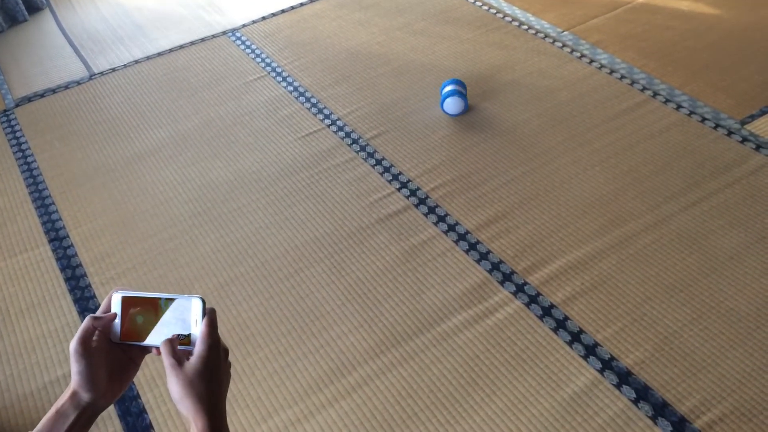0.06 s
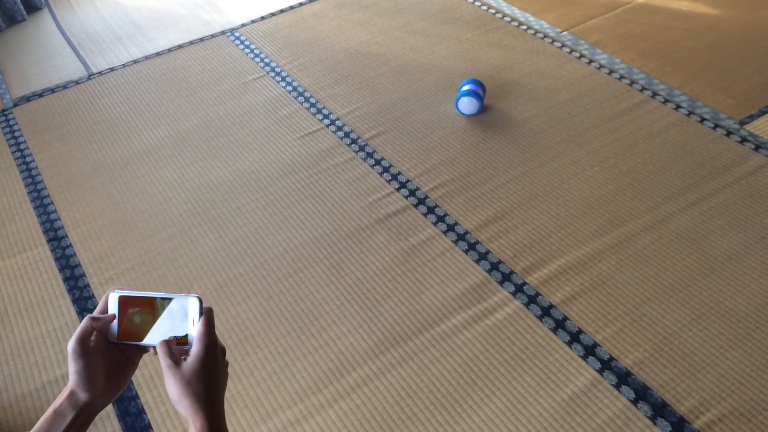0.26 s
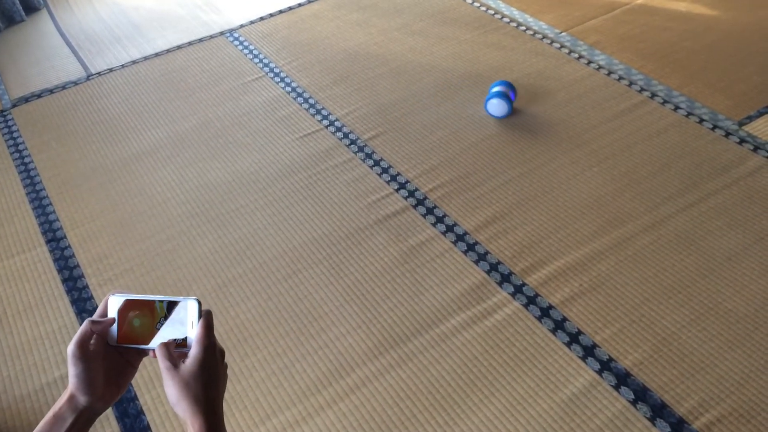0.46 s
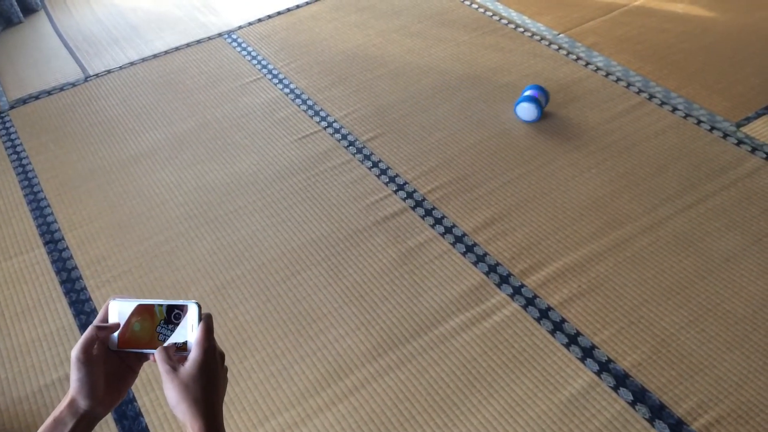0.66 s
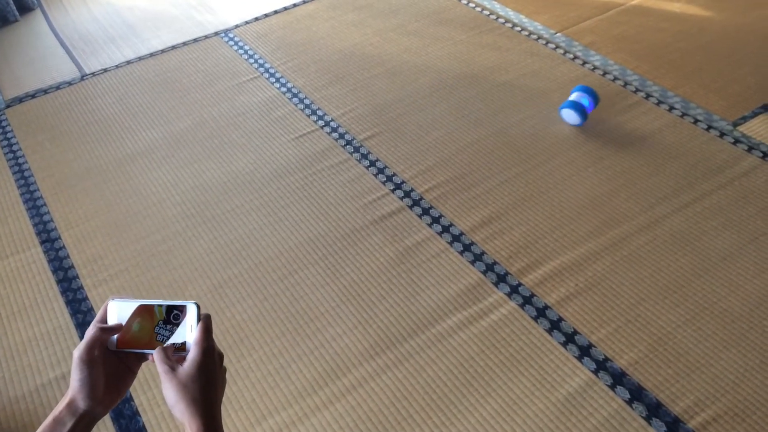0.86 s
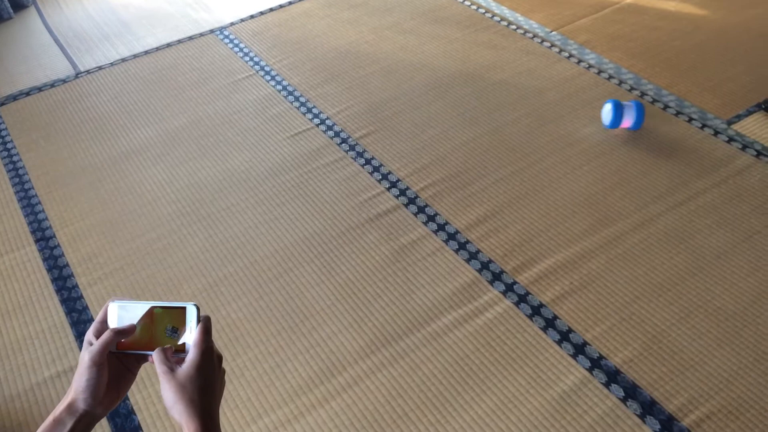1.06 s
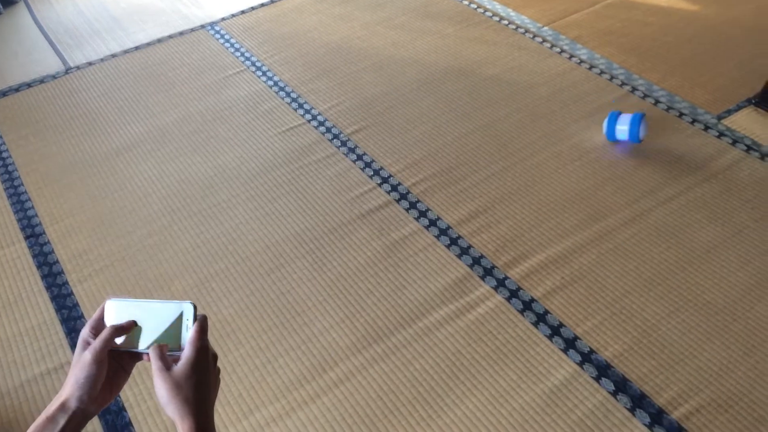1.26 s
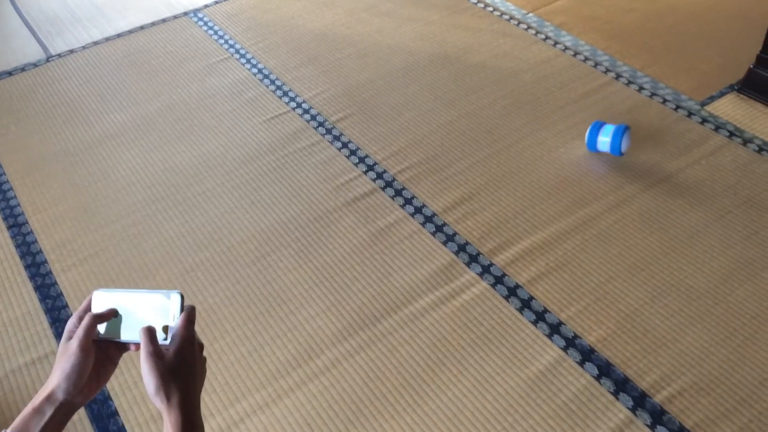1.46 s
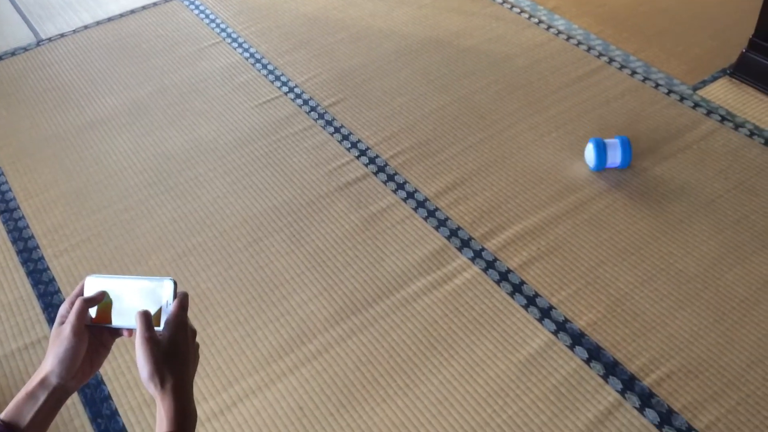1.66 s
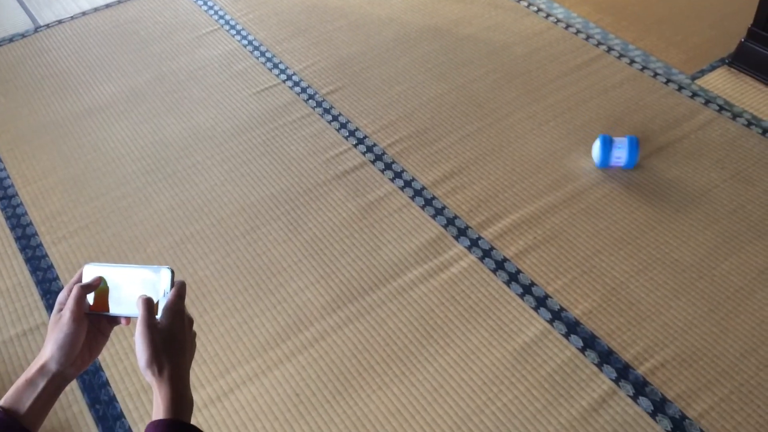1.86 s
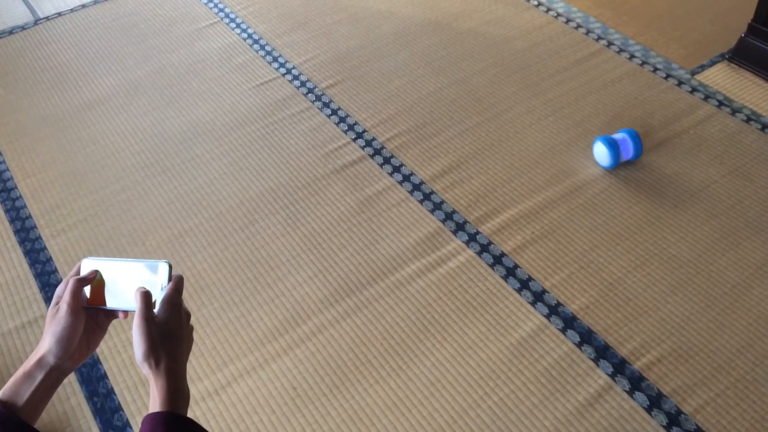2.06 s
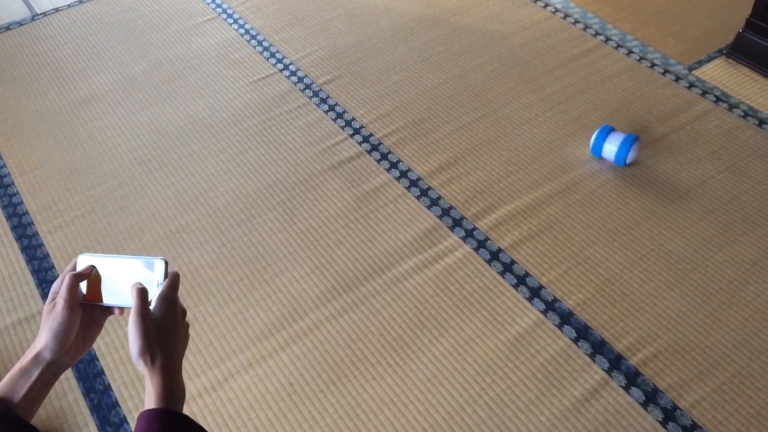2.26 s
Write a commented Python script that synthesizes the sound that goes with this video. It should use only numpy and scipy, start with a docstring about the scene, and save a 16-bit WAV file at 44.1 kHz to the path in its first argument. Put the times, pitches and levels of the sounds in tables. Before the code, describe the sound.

A small toy robot's gears whir and chatter, rising in pitch as it speeds across a straw mat with soft bumps and low rumble. It brakes, then creeps on with light plastic clicks, about two metres away in a quiet room.

```python
"""A quiet room, a woven straw mat two metres away: a small barrel-shaped toy robot speeds up across it,
turns, brakes and creeps on. Up front, its gear teeth whine and chatter in the ringing plastic shell
and loose parts click. Underneath, its rims bump and scuff the weave and the mat booms softly under
its weight, over a bed of rolling rumble and still air."""
import sys
import numpy as np
from scipy import signal
from scipy.fft import rfft, irfft
from scipy.io import wavfile
from scipy.ndimage import uniform_filter1d

SR = 44100
rng = np.random.default_rng(int(sys.argv[2]) if len(sys.argv) > 2 else 0)


def digitize_waveform(pressure):
    """Quantize a signal to 16-bit integers and store it at the path in sys.argv[1].

    Rows of a 2-D input are taken as channels; values are limited to [-1, 1].
    """
    field = np.atleast_2d(pressure).T
    bounded = np.clip(field, -1, 1)
    quanta = np.round(bounded * 32767).astype(np.int16)
    wavfile.write(sys.argv[1], SR, quanta)


N = 101429

# EQ curves for the air, rumble, rim scuff, gear chatter and shell treble: frequency_hz, gain_db
AIR_EQ = [(20, -3), (35, -38), (54, 13), (75, -28), (110, -17.5), (200, -2.5), (300, -15), (700, -20),
          (3000, -26), (15000, -41.5)]
RUMBLE_EQ = [(20, -29), (40, -6.5), (58, -1), (80, 7.5), (110, -4), (200, -9.5), (280, -17), (600, -22),
             (1500, -12), (8000, -113)]
SCUFF_EQ = [(100, -17), (300, 2), (480, -1), (700, -4), (1000, -4), (1600, 3.5), (4000, -43),
            (15000, -25.5)]
CHATTER_EQ = [(100, -8), (400, -25.5), (750, -13.5), (1100, 6), (3200, -1.5), (4500, -14), (8000, -27.5),
              (15000, 8)]
TREBLE_EQ = [(500, -54), (2800, -12), (4000, -1.5), (9300, 0), (11000, -3), (15000, -3)]
# Resonances of the mat and floorboards: pitch_hz, width_hz, gain_db
BOOM_MODES = [(55.8, 6.5, -2), (80.8, 16, -8.5)]
KNOCK_MODES = [(128.5, 13, 0), (148.5, 13, -5.5), (204, 23, -0.5), (337.4, 28, -13)]
# Resonances of a snapping part and of the plastic shell: pitch_hz, width_hz, gain_db
SNAP_MODES = [(1240, 140, -7.5), (2000, 190, -6), (2390, 110, -4), (2810, 140, -1.5), (3170, 98, 2),
              (4015, 300, -8)]
SHELL_MID_MODES = [(894, 79, -6), (1338, 97, -1.5), (1633, 226, -3), (1992, 252, 0), (2525, 193, -1.5),
                   (2807, 127, -1.5), (3070, 195, 1), (3800, 560, -8)]
SHELL_HIGH_MODES = [(3910, 730, -4), (5090, 900, -3), (6074, 690, -1.5), (6680, 320, 1), (7180, 690, -6),
                    (8720, 1310, -6.5), (12350, 6000, -21.5)]
# Fader ride on the rolling rumble: time_s, level_db
RUMBLE_LEVEL = [(0, -64), (.5, -57.5), (.62, -44), (.95, -48), (1.05, -53.5), (1.25, -48), (1.48, -51.5),
                (1.62, -48.5), (1.76, -48.5), (1.88, -54.5), (2.3, -60)]
# The mat giving under the weight: start_s, deep_mode_db, upper_mode_db
MAT_THUDS = [(.582, -32, -36), (.718, -33, -40), (.838, -35, -35), (.925, -43, -50), (1.352, -39, -37),
             (1.53, -50, -35), (1.575, -50, -40), (1.70, -52, -42), (1.75, -52, -43), (1.825, -56, -48),
             (1.97, -58, -50), (2.09, -58, -49), (2.222, -60, -50)]
# Rim hits on the mat: start_s, length_s, boom_db, knock_db, scuff_db, rattle_db
RIM_BUMPS = [(0.532, .035, -38.5, -41, -49, -39), (.668, 0.036, -35, -42.5, -39.5, -40),
             (0.801, 0.052, -40, -41, -41, -36.5), (0.984, 0.035, -58, -74, -54, -40.5),
             (1.041, 0.027, -44, -42, -43, -37), (1.163, 0.043, -44.5, -44, -42.5, -39.5),
             (1.331, .028, -42, -34.5, -41.5, -38.5), (1.511, 0.023, -40, -34.5, -35.5, -32),
             (1.678, 0.019, -41, -53, -41.5, -41.5)]
# Loose plastic snapping, plus the sharp knock inside some rim hits (the loud rows near .68, 1.18, 1.35 and 1.53
# s): start_s, mid_db, treble_db
CLICKS = [(0.034, -67, -58), (.14, -68, -55), (.682, -31, -51), (1.183, -33, -59), (1.347, -33, -40),
          (1.528, -38.5, -36.5), (1.648, -52, -65), (1.688, -64, -42.5), (1.746, -52, -44),
          (1.845, -46, -49.5), (1.865, -46.5, -66), (1.937, -57, -48.5), (2.095, -54, -58),
          (2.138, -39, -44), (2.143, -39.5, -50), (2.155, -48, -50.5), (2.267, -60, -62)]
# Gear speed, as the rate of meshing teeth: time_s, pitch_hz
MESH_PITCH = [(0, 950), (.2, 1000), (.285, 1100), (.34, 1300), (.41, 1399), (.49, 1506), (.57, 1600),
              (.64, 1775), (.71, 1500), (.79, 1680), (.84, 2057), (.92, 1926), (1.01, 1960), (1.12, 1926),
              (1.24, 2175), (1.34, 2487), (1.42, 1956), (1.462, 1370), (1.495, 1130), (1.56, 1880),
              (1.64, 1297), (2.3, 899)]
# Fader ride on the gear chatter: time_s, mid_db, treble_db
CHATTER_LEVEL = [(0, -55.5, -73), (.12, -52, -64), (.19, -44.5, -57), (.29, -41.5, -52), (.41, -38.5, -47),
                 (.62, -40, -45.5), (.78, -36.5, -46), (.97, -37, -45), (1.12, -37, -42),
                 (1.32, -33, -39.5), (1.435, -38, -41.5), (1.458, -35.5, -32), (1.485, -34.5, -34.5),
                 (1.505, -36, -43.5), (1.565, -39, -41.5), (1.61, -50, -58.5), (1.72, -42.5, -49),
                 (1.84, -50.5, -60), (1.9, -55, -61.5), (2.08, -54, -62), (2.13, -48, -60.5),
                 (2.22, -75, -73), (2.3, -64, -96)]
# Fader ride on the gear whine: time_s, level_db
WHINE_LEVEL = [(0, -82), (.265, -73), (.287, -42), (.36, -65), (.41, -42), (.56, -47.5), (.635, -37.5),
               (.72, -46), (.84, -35.5), (.95, -41.5), (1.1, -39), (1.3, -48), (1.44, -46), (1.466, -31),
               (1.485, -34), (1.515, -70), (1.56, -33.5), (1.62, -58.5), (2.3, -74)]

AIR_DB, LOW_CUT_HZ, HIGH_CUT_HZ = -59, 18, 15380
ROOM_T60_S, ROOM_HIGH_T60_S, REVERB_DB, PREDELAY_S = .34, .26, -6, .0092
PUSH_S, CLICK_ATTACK_S, CLICK_DECAY_S = .011, .0021, .0045
WEAVE_GRAINS_PER_S, WEAVE_SCATTER_DB, BUMP_ATTACK_S, BUMP_RELEASE_S = 2200, 6, .0054, .02
SWELL_PER_S, SWELL_DB, RATTLE_TREBLE_DB = 25.8, 2, -8.5
TOOTH_SCATTER_DB, JITTER_TEETH, TOOTH_GAIN = 2.5, .3, .89
BACKLASH_PER_S, BACKLASH_SCATTER_DB, CHATTER_FLUTTER_DB = 1800, 3.5, 1
SPEED_WOBBLE, WHINE_FLUTTER_DB, OVERTONE_DB = .016, 4.5, -18


def undb(db):
    """Decibels to gain."""
    return 10 ** (np.asarray(db) / 20)


def unit(x):
    """Scale to rms 1."""
    return x / np.sqrt(np.mean(x ** 2))


def curve(table, column=1):
    """An automation lane: one table column, joined by straight lines in time."""
    rows = np.array(table, float)
    return np.interp(np.arange(N) / SR, rows[:, 0], rows[:, column])


def drift(rate):
    """Smooth random modulation, rms 1; a higher rate moves faster."""
    span = max(int(SR / rate), 1)
    return unit(uniform_filter1d(uniform_filter1d(rng.standard_normal(N), span), span))


def eq(points, size=8192):
    """Minimum-phase impulse response of an EQ curve, energy 1."""
    hz, db = np.array(points, float).T
    bins_hz = np.maximum(np.arange(size // 2 + 1) * SR / size, 1)
    cepstrum = irfft(np.log(undb(np.interp(np.log(bins_hz), np.log(hz), db))))
    cepstrum[1:size // 2] *= 2
    cepstrum[size // 2 + 1:] = 0
    response = irfft(np.exp(rfft(cepstrum)))
    return response / np.linalg.norm(response)


def partials(modes, size):
    """One dying sine per resonance, alternating in polarity."""
    t = np.arange(size) / SR
    return [(-1) ** k * undb(db) * width * np.exp(-np.pi * width * t) * np.sin(2 * np.pi * hz * t)
            for k, (hz, width, db) in enumerate(modes)]


def body(modes):
    """Impulse response of a resonant body, energy 1."""
    response = sum(partials(modes, size=16384))
    return response / np.linalg.norm(response)


def ring(force, response):
    """Play a force through an impulse response."""
    return signal.fftconvolve(force, response)[:N]


def scatter(spread_db):
    """Random gains that make hits uneven."""
    return undb(spread_db * np.clip(rng.standard_normal(N), -2, 2))


def grains(rate, scatter_db):
    """Tiny random impacts of uneven size, rms 1."""
    hits = rng.random(N) < rate / SR
    return unit(hits * np.sign(rng.standard_normal(N)) * scatter(scatter_db))


def still_air():
    """The bed: faint, steady, dark room tone."""
    return ring(rng.standard_normal(N), eq(AIR_EQ)) * undb(AIR_DB)


def room_tail(size=22050):
    """A short diffuse tail whose treble dies first."""
    t = np.arange(size) / SR
    noise = rng.standard_normal(size)
    low = signal.sosfilt(signal.butter(2, 3500, fs=SR, output="sos"), noise)
    tail = low * undb(-60 * t / ROOM_T60_S) + (noise - low) * undb(-60 * t / ROOM_HIGH_T60_S)
    tail *= t > PREDELAY_S
    return tail / np.linalg.norm(tail)


def room(direct, spots=9):
    """Direct sound plus reverb, crossfading between tails as the toy moves from spot to spot."""
    position = np.linspace(0, spots - 1, N)
    fades = (np.sqrt(np.maximum(1 - np.abs(position - k), 0)) for k in range(spots))
    reverb = sum(ring(direct * fade, room_tail()) for fade in fades)
    wet = undb(REVERB_DB)
    return (direct + wet * reverb) / np.hypot(1, wet)


def rolling_rumble():
    """The barrel rolls along: low noise that swells and eases off."""
    return ring(rng.standard_normal(N), eq(RUMBLE_EQ)) * undb(curve(RUMBLE_LEVEL))


def mat_thuds():
    """The toy's weight lands in a soft push; where it lands sets how much each floor mode booms."""
    t = np.arange(N) / SR
    boom = 0
    for k, (hz, width, _) in enumerate(BOOM_MODES):
        push = sum(undb(dbs[k]) * np.sin(np.pi * np.clip((t - start) / PUSH_S, 0, 1))
                   for start, *dbs in MAT_THUDS)
        mode = (-1) ** k * np.exp(-np.pi * width * t) * np.sin(2 * np.pi * hz * t)
        boom += ring(push, mode)
    return boom / (PUSH_S * SR / 2)


def rim_bumps():
    """Rims drag over the weave, shaking mat and shell. Returns mat sound and shell force."""
    t = np.arange(N) / SR
    envelopes = np.zeros((4, N))
    for start, length, *dbs in RIM_BUMPS:
        attack = np.clip((t - start) / BUMP_ATTACK_S, 0, 1)
        release = np.exp(-np.maximum(t - start - length, 0) / BUMP_RELEASE_S)
        envelopes += undb(dbs)[:, None] * attack * release
    boom, knock, scuff, rattle = envelopes * grains(WEAVE_GRAINS_PER_S, WEAVE_SCATTER_DB)
    mat = ring(boom, body(BOOM_MODES)) + ring(knock, body(KNOCK_MODES)) + ring(scuff, eq(SCUFF_EQ))
    return mat, rattle


def clicks_and_knocks():
    """Loose parts snap against the shell and rims knock sharply. Returns mid force and treble force."""
    t = np.arange(N) / SR
    envelopes = np.zeros((2, N))
    for start, *dbs in CLICKS:
        attack = np.clip((t - start) / CLICK_ATTACK_S, 0, 1)
        decay = np.exp(-np.maximum(t - start, 0) / CLICK_DECAY_S)
        envelopes += undb(dbs)[:, None] * attack * decay
    return 2 * envelopes * rng.standard_normal(N)


def shell_ring(force, modes, colour):
    """The plastic shell rings; each resonance swells and fades on its own as the barrel turns."""
    responses = [signal.fftconvolve(partial, eq(colour)) for partial in partials(modes, size=4096)]
    shell = sum(ring(force, mode) * unit(undb(SWELL_DB * drift(SWELL_PER_S))) for mode in responses)
    return shell / np.linalg.norm(sum(responses))


def gears():
    """Uneven teeth and backlash hit the shell; the mesh whines. Returns mid force, treble force, whine."""
    mesh_hz = curve(MESH_PITCH) * (1 + SPEED_WOBBLE * drift(90))
    teeth_passed = np.cumsum(mesh_hz) / SR
    tooth_index = np.maximum.accumulate(np.floor(teeth_passed + JITTER_TEETH * drift(1500)))
    strikes = np.diff(tooth_index, prepend=0) > 0
    teeth = unit(strikes * scatter(TOOTH_SCATTER_DB))
    teeth -= uniform_filter1d(teeth, size=200)  # thin out the low end
    backlash = grains(BACKLASH_PER_S * mesh_hz / mesh_hz.mean(), BACKLASH_SCATTER_DB)
    impacts = (TOOTH_GAIN * teeth + backlash) / np.sqrt(mesh_hz)  # denser with speed, not louder
    chatter = unit(impacts * undb(CHATTER_FLUTTER_DB * drift(90)))
    phase = 2 * np.pi * teeth_passed
    whine = np.sin(phase) + undb(OVERTONE_DB) * np.sin(2 * phase)
    whine = unit(whine * undb(WHINE_FLUTTER_DB * drift(59)))
    return (chatter * undb(curve(CHATTER_LEVEL, column=1)),
            chatter * undb(curve(CHATTER_LEVEL, column=2)),
            whine * undb(curve(WHINE_LEVEL)))


def scene():
    """The mix: shell, clicks and whine get the reverb; mat, rumble and air stay dry."""
    chatter, chatter_high, whine = gears()
    mat, rattle = rim_bumps()
    click, click_high = clicks_and_knocks()
    mids = shell_ring(chatter + rattle, SHELL_MID_MODES, CHATTER_EQ) + ring(click, body(SNAP_MODES))
    treble_force = chatter_high + undb(RATTLE_TREBLE_DB) * rattle + click_high
    highs = shell_ring(treble_force, SHELL_HIGH_MODES, TREBLE_EQ)
    bed = rolling_rumble() + still_air()
    return (bed + mat_thuds() + mat + room(mids + highs + whine))[None]


def record(dry):
    """Master EQ: roll off the deepest bass and cut the very top steeply."""
    trimmed = signal.sosfilt(signal.butter(2, LOW_CUT_HZ, "high", fs=SR, output="sos"), dry)
    return signal.sosfilt(signal.ellip(10, .2, 70, HIGH_CUT_HZ, fs=SR, output="sos"), trimmed)


dry = scene()
out = record(dry)
digitize_waveform(out)
```